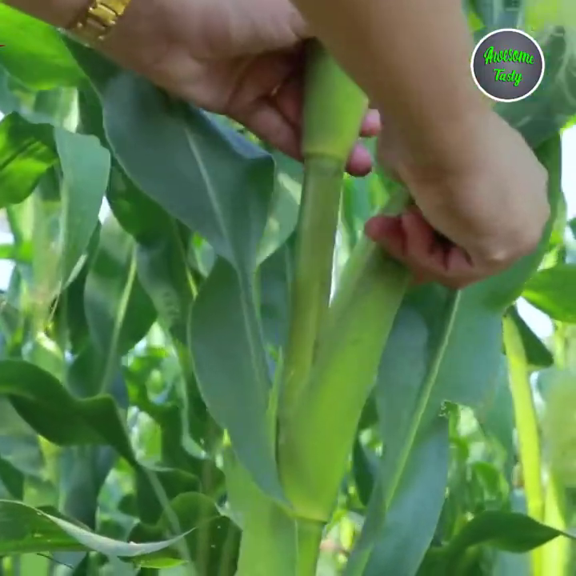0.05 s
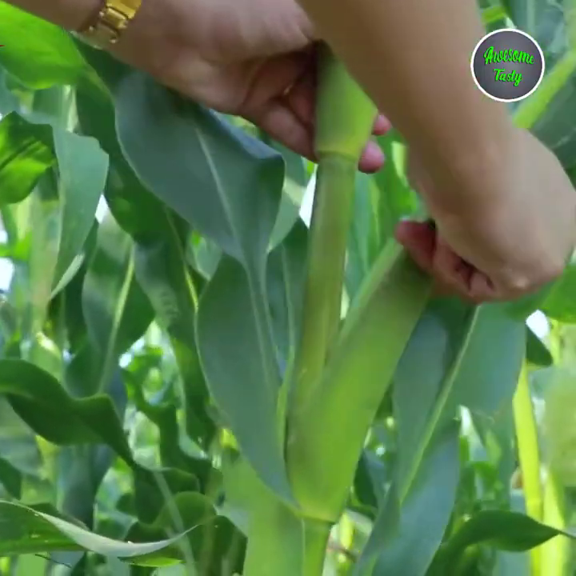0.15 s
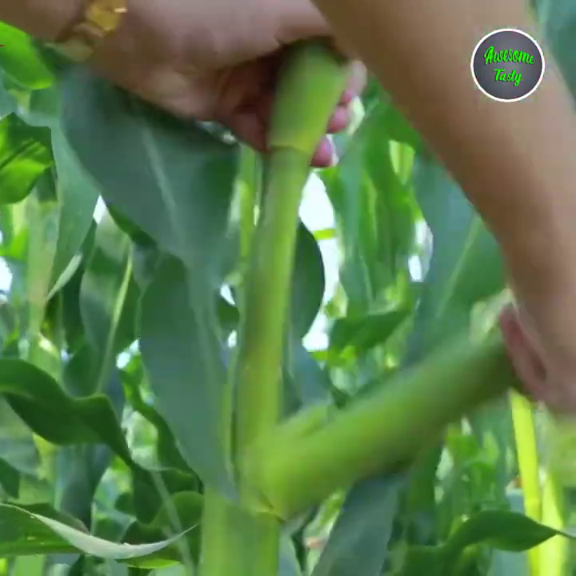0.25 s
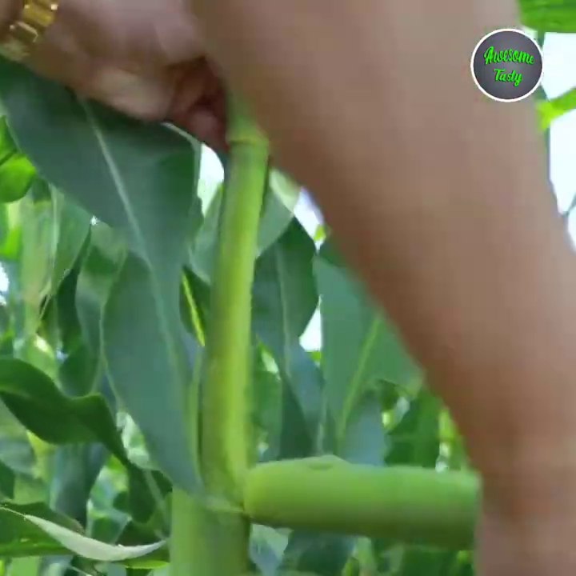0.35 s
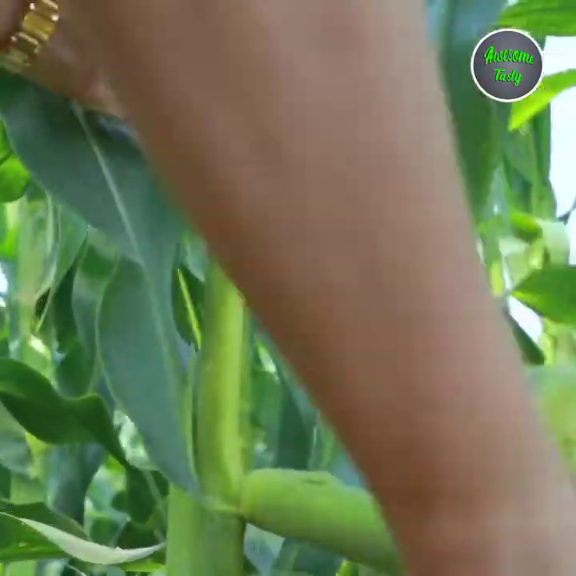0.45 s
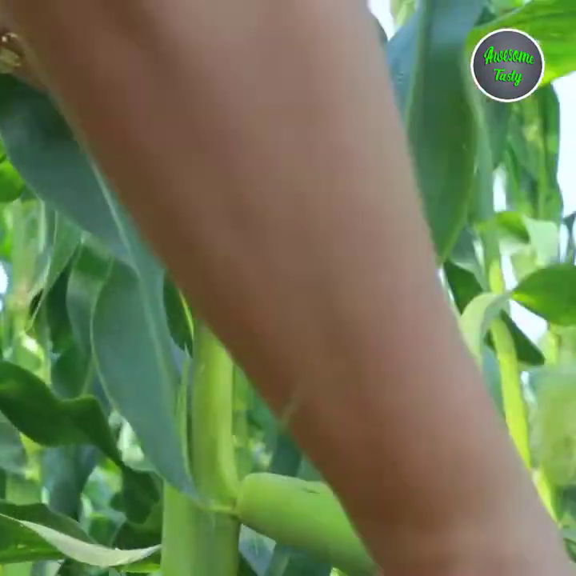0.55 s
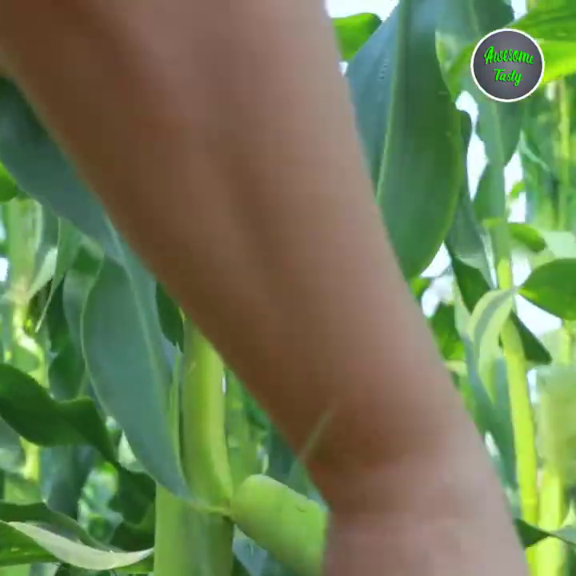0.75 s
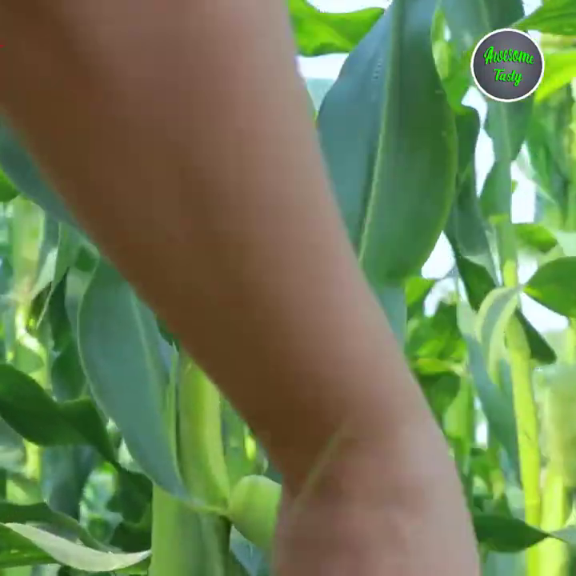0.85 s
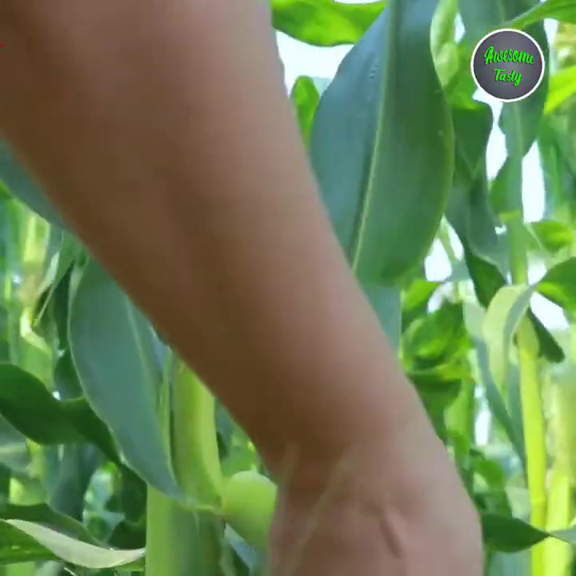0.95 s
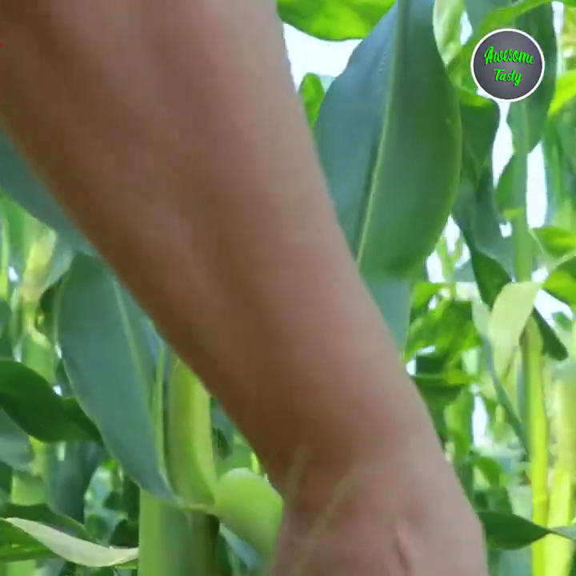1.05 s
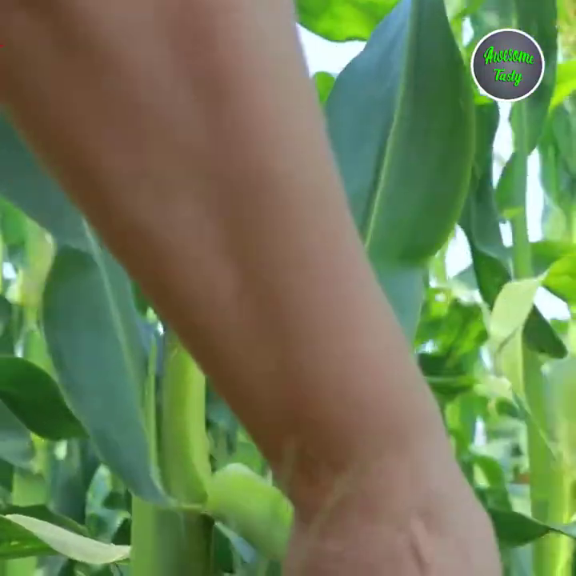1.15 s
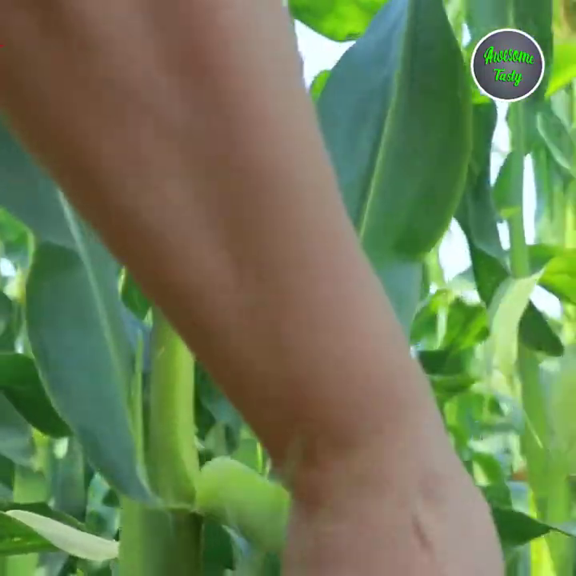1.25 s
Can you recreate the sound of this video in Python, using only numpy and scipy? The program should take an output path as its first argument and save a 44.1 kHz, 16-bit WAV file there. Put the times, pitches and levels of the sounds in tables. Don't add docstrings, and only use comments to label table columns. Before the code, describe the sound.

Loud splintering snap of a corn ear torn from its stalk, followed by dry leaf rustling

```python
import sys
import numpy as np
from scipy import signal
from scipy.fft import rfft, irfft
from scipy.io import wavfile
from scipy.ndimage import uniform_filter1d

SR = 44100
rng = np.random.default_rng(int(sys.argv[2]) if len(sys.argv) > 2 else 0)


def inscribe(sig):
    pcm = np.round(np.clip(np.atleast_2d(sig).T, -1, 1) * 32767)
    wavfile.write(sys.argv[1], SR, pcm.astype(np.int16))


def invert_db(x):
    u = np.asarray(x, float) / 20
    return 10 ** u


N = 57330
TIME = np.arange(N) / SR


def evened(x):
    return x / np.sqrt(np.mean(x ** 2) + 1e-20)


def read_curve(points, hz):
    f, value = np.transpose(points)
    return np.interp(np.log(hz + 1), np.log(f + 1), value)


def add(mix, s, sound):
    part = mix[max(round(s * SR), 0):][:len(sound)]
    part += sound[:len(part)]


def resonate(x, hz, width_hz):
    r = np.exp(-np.pi * width_hz / SR)
    return signal.lfilter([1, 0, -1], [1, -2 * r * np.cos(2 * np.pi * hz / SR), r * r], x)


def colour(x, points):
    log_gain = np.log(invert_db(read_curve(points, np.abs(np.fft.fftfreq(4096, 1 / SR)))))
    taps = np.fft.ifft(np.conj(np.exp(signal.hilbert(log_gain)))).real[:2048]
    return signal.oaconvolve(x, taps / np.linalg.norm(taps))[:len(x)]


def blip(s, db, hz, cycles):
    t = np.arange(-cycles / hz * 2, cycles / hz * 2, 1 / SR)
    envelope = np.exp(-(2 * t * hz / cycles) ** 2)
    return s + t[0], -invert_db(db) * np.cos(2 * np.pi * hz * t) * envelope


def shaped(x, db):
    hz, t, z = signal.stft(x, SR, nperseg=256, noverlap=192)
    return signal.istft(z * invert_db(db(hz[:, None], t[None])), SR, nperseg=256, noverlap=192)[1][:N]


# (time [s], level [dB])
TEAR = [
    (.214, -74),
    (0.224, -64),
    (0.233, -15),
    (0.236, -21),
    (.27, -10.5),
    (0.299, -16),
    (.306, -17.5),
    (.335, -24),
    (.37, -48),
]


def tearing():
    s, db = np.transpose(TEAR)
    spikes_db = 2.6 * np.minimum(rng.exponential(1, N), 4)
    rough = evened(rng.standard_normal(N) * invert_db(spikes_db))
    return invert_db(np.interp(TIME, s, db, -120, -120)) * rough


CRACK_S = [.1957, .2209, .2235, .2263, .233, .235, .2375, .2409, .2426, .252, .2563, .259, .2633, .2648,
           .2675, .273, .2768, .2799, .2828, .288, .2903, .2946, .2966, .301, .3114, .3143, .3204, .3276,
           .3314, .3485]
CRACK_HZ = [2300, 2150, 2440, 3450, 2430, 3600, 2500, 2500, 3700, 2400, 2600, 2500, 2500, 3100, 2700, 2960,
            2600, 3590, 2870, 2400, 2800, 2760, 2260, 2110, 4500, 2190, 4600, 4700, 2300, 2500]
# (peak level [dB], tearing length [ms])
CRACKS = [(-25, 0.58), (-32, 0.43), (-14.5, 0.84), (-20, 0.4), (2.5, 0.94), (0.5, 1.7), (-2.5, 2),
          (-3, 2.75), (-5.5, 1.9), (2.5, 1.1), (1.5, 2.9), (-2, 1.7), (-5, 2.5), (4, 3.04), (7, 1.62),
          (-2.5, 2.3), (-1, 0.82), (-4.5, 3.1), (-9.5, 4.8), (-1.5, 1.3), (-2, 1.1), (-2.5, 2.05), (1, 2.3),
          (5.5, 0.67), (-2.5, 1.06), (-9, 0.3), (-7, 0.19), (-4.5, 0.53), (-3.5, 0.52), (-17.5, 1.8)]
# (frequency [Hz], level [dB])
CRACK_AIR = [(88, -46), (150, -58), (466, -10.5), (716, 1), (1560, 4), (2810, 4.5), (3220, 2), (8730, -3),
             (16000, -12.5)]
# (frequency [Hz], width [Hz], level [dB])
STALK = [
    (466, 142, -28),
    (213, 240, -42.5),
    (1030, 200, -35.5),
]
RING_WIDTH_HZ, RING_DB = 450, -1
EDGE_DB, SNAP_DB = -17, 2.5


def snap():
    out, drive = np.zeros(N), np.zeros(N)
    t = np.arange(0, .012, 1 / SR)
    rattles = rng.standard_normal((len(CRACKS), len(t)))
    for s, hz, (db, ms), rattle in zip(CRACK_S, CRACK_HZ, CRACKS, rattles):
        push = rattle * np.exp(-(1000 * t / max(ms, .1)) ** 3)
        push[0] = 2 * invert_db(EDGE_DB) * np.sqrt(ms * SR / 1000)
        ring = resonate(push, hz, RING_WIDTH_HZ)
        add(out, s, invert_db(db + RING_DB) * ring / abs(ring).max())
        add(drive, s, invert_db(db) * push / 3)
    tear = tearing()
    out += colour(invert_db(SNAP_DB) * drive + tear, CRACK_AIR)
    for hz, width_hz, db in STALK:
        out += invert_db(db) * resonate(drive + tear, hz, width_hz)
    return out


# (time [s], level [dB], dryness [dB])
LEAVES = [(0, -39, 6), (.11, -33, -9), (.2, -35.5, -5), (.36, -27.5, -3.5), (0.411, -27, -2.5),
          (0.451, -23.5, -2), (0.473, -31, -8.5), (.53, -32, -5), (.59, -41, -0.5), (.65, -28.5, -4.5),
          (0.712, -41.5, -0.5), (.75, -31, -4.5), (.8, -37.5, -3.5), (.85, -49, 5.5), (.97, -42, -1),
          (1.06, -40.5, 1), (1.162, -43.5, 0.5), (1.3, -32.5, -8.5)]
# (frequency [Hz], level [dB])
LEAF = [(150, -44.5), (250, -5), (393, -5.5), (831, -6.5), (971, -4), (2050, -5), (2240, -7), (4730, -8),
        (16000, -27.5)]
GRAINS_PER_S, GRAIN_SPREAD_DB, GRAIN_DB = 4000, 2, -7
PATCHY_DB, DRY_FROM_HZ = 2, 2430


def leaves():
    s, level_db, dryness_db = np.transpose(LEAVES)
    struck = rng.random(N) < GRAINS_PER_S / SR
    spread_db = GRAIN_SPREAD_DB * np.minimum(rng.exponential(1, N), 2)
    grains = struck * rng.standard_normal(N) * invert_db(spread_db)
    brush = evened(colour(rng.standard_normal(N) + invert_db(GRAIN_DB) * evened(grains), LEAF))

    patches = uniform_filter1d(rng.standard_normal((129, N // 64 + 9)), size=6, axis=0)
    patches = evened(uniform_filter1d(patches, size=10, axis=1))

    def texture_db(hz, t):
        treble = hz ** 2 / (hz ** 2 + DRY_FROM_HZ ** 2)
        return PATCHY_DB * patches[:, :t.size] + np.interp(t, s, dryness_db) * treble

    return shaped(brush, texture_db) * invert_db(np.interp(TIME, s, level_db))


KNOCK_S = [.4085, .449, .531, .655, 1.2589, 1.2325, 1.18, .62, .945, .41]
KNOCK_HZ = [2000, 1600, 590, 420, 610, 600, 4620, 1900, 270, 380]
# (peak level [dB], length [cycles])
KNOCKS = [
    (-21, 5),
    (-18.5, 5),
    (-24, 3),
    (-29, 3),
    (-15.5, 2),
    (-28, 1.5),
    (-31, 9),
    (-31, 8),
    (-38, 4),
    (-33, 3),
]


def knocks():
    out = np.zeros(N)
    for s, hz, (db, cycles) in zip(KNOCK_S, KNOCK_HZ, KNOCKS):
        add(out, *blip(s, db, hz, cycles))
    return out


SCRAPE_S = [.655, 1.1785, 1.212, 1.231, .425, .737, .1957, .215, 1.18, .683, 1.04, 1.1, 1.25, .418, .0,
            .197]
SCRAPE_LENGTH_S = [.05, .002, .007, .012, .043, .02, .0012, .018, .007, .022, .035, .05, .02, .02, .04,
                   .005]
# (level [dB], lowest frequency [Hz], highest frequency [Hz])
SCRAPES = [(-41.5, 8000, 19000), (-29, 4000, 15000), (-43, 7700, 13000), (-41, 2400, 12000),
           (-35, 7200, 15500), (-43, 1200, 9200), (-23.5, 4600, 19000), (-33, 8900, 13000),
           (-42, 3700, 15000), (-40.5, 9700, 10940), (-39.5, 1200, 5600), (-41, 920, 2000),
           (-35, 890, 2600), (-39, 1300, 2200), (-52, 1400, 19000), (-39, 1200, 5700)]
SCRAPE_FLUTTER_DB = 1.5


def scrapes():
    out = np.zeros(N)
    noises = rng.standard_normal((len(SCRAPES), 2, 4000))
    for s, length, (db, low_hz, high_hz), (hiss, flutter) in zip(SCRAPE_S, SCRAPE_LENGTH_S, SCRAPES, noises):
        u = np.arange(4000) / SR / length
        band = signal.butter(2, [low_hz, high_hz], "band", fs=SR, output="sos")
        hiss = evened(signal.sosfilt(band, hiss))
        flutter_db = SCRAPE_FLUTTER_DB * evened(uniform_filter1d(flutter, size=60))
        envelope = np.minimum(u * 5, 1) * np.exp(-u ** 4)
        add(out, s, invert_db(db + flutter_db) * hiss * envelope)
    return out


STROKE_S = [.0115, .0515, .1, .135]
# (peak level [dB], frequency [Hz], length [cycles])
STROKES = [
    (-31, 78, 2.1),
    (-28.5, 136, 2.1),
    (-42, 90, 2.2),
    (-44, 150, 2.2),
]
ENGINE_PERIOD_S, ENGINE_WOBBLE_S, ENGINE_VARY_DB = .1605, .0006, 1


def engine():
    out = np.zeros(N + SR)
    for k, (late, *vary) in enumerate(rng.standard_normal((9, 5))):
        cycle_s = 1 + k * ENGINE_PERIOD_S + ENGINE_WOBBLE_S * late
        for delay, (db, hz, cycles), v in zip(STROKE_S, STROKES, vary):
            add(out, *blip(cycle_s + delay, db + ENGINE_VARY_DB * v, hz, cycles))
    return out[SR:]


SWAY_FROM_S, SWAY_HZ, SWAY_WIDTH_HZ, SWAY_DB = .92, 255, 35, -46


def sway():
    rise = np.clip((TIME - SWAY_FROM_S) * 20, 0, 1)
    return invert_db(SWAY_DB) * rise * evened(resonate(rng.standard_normal(N), SWAY_HZ, SWAY_WIDTH_HZ))


FIELD_DB = -38
# (frequency [Hz], level [dB])
FIELD = [(15, -43), (25, -19), (97, 0), (157, 1.5), (489, -8.5), (591, -10), (962, -12.5), (2410, -13),
         (16000, -82)]


def field():
    gain = invert_db(read_curve(FIELD, np.fft.rfftfreq(N, 1 / SR)))
    return invert_db(FIELD_DB) * evened(irfft(rfft(rng.standard_normal(N)) * gain, N))


def scene():
    close = snap() + leaves() + knocks() + scrapes()
    return (close + engine() + sway() + field())[None]


def band_limit(x):
    return signal.sosfilt(signal.butter(12, 16180, fs=SR, output="sos"), x)


LOW_CUT_HZ, OVERLOAD_DB, EDGE_HZ = 35, -.6, 15950


def record(dry):
    thin = signal.sosfilt(signal.butter(2, LOW_CUT_HZ, "high", fs=SR, output="sos"), dry)
    overloaded = np.clip(thin, -invert_db(OVERLOAD_DB), invert_db(OVERLOAD_DB))
    mix = signal.oaconvolve(overloaded, signal.firwin(511, EDGE_HZ, fs=SR)[None], "same")
    return band_limit(mix)


dry = scene()
out = record(dry)
inscribe(out)
```